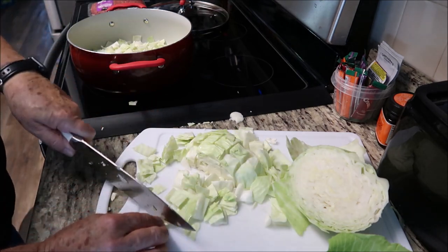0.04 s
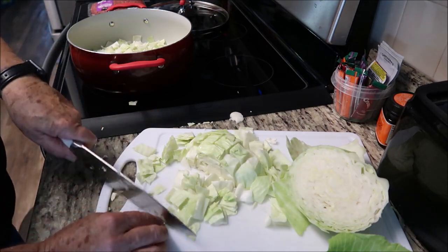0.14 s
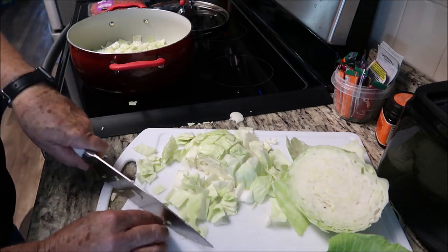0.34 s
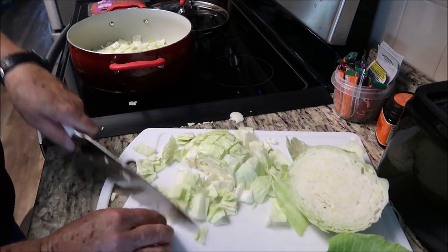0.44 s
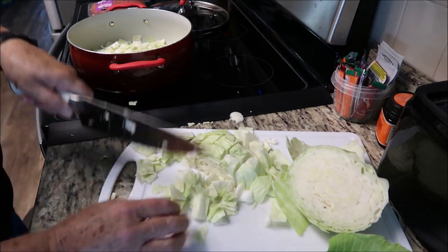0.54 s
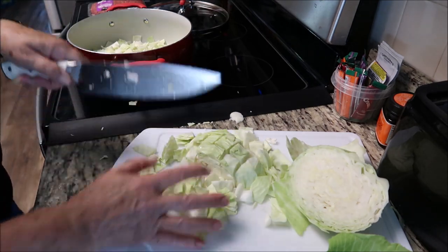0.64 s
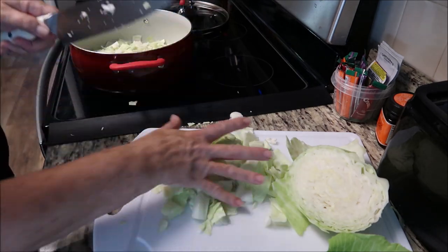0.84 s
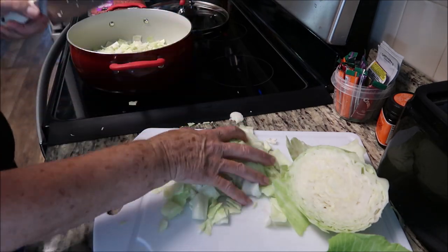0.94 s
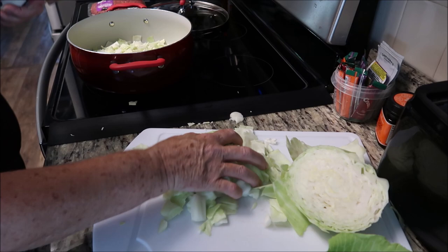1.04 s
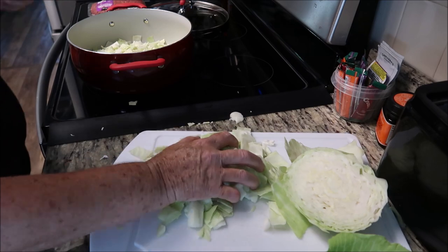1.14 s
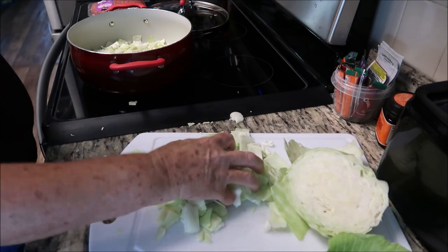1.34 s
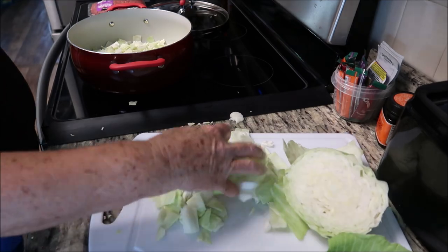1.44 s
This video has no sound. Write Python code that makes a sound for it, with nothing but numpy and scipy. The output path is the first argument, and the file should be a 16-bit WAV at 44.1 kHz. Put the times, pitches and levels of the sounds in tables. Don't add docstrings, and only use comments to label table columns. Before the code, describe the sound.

A knife crunches through cabbage and knocks hard on a plastic board, then pieces rustle

```python
import sys
import numpy as np
from scipy import signal
from scipy.fft import rfft, irfft
from scipy.io import wavfile

SR = 44100
rng = np.random.default_rng(int(sys.argv[2]) if len(sys.argv) > 2 else 0)


def invert_db(x):
    u = np.asarray(x, float) / 20
    return 10 ** u


def digitize_waveform(pressure):
    field = np.atleast_2d(pressure).T
    bounded = np.clip(field, -1, 1)
    quanta = np.round(bounded * 32767).astype(np.int16)
    wavfile.write(sys.argv[1], SR, quanta)


N = 66150
T = np.arange(N) / SR


def in_time(rows):
    s, level, bright = np.transpose(rows)
    return np.interp(T, s, level, left=-120, right=-120), np.interp(T, s, bright)


def rms_one(x):
    return x / np.sqrt(np.mean(x ** 2) + 1e-20)


def drift(rate_hz):
    r = np.exp(-2 * np.pi * rate_hz * 40 / SR)
    noise = rng.standard_normal(N // 40 + 2002)
    slow = signal.lfilter([1], [1, -2 * r, r * r], noise)[2000:]
    return np.interp(np.arange(N) / 40, np.arange(len(slow)), rms_one(slow))


def ring(strikes, hz, t60):
    r = invert_db(-60 / (t60 * SR))
    w = 2 * np.pi * hz / SR
    return signal.lfilter([0, np.sin(w)], [1, -2 * r * np.cos(w), r * r], strikes + 1e-18)


def resonance(x, hz, width):
    r = np.exp(-np.pi * width / SR)
    poles = [1, -2 * r * np.cos(2 * np.pi * hz / SR), r * r]
    return signal.lfilter(np.array([1, 0, -1]) * (1 - r * r) / 2, poles, x)


def colour(x, spectrum):
    hz, db = np.transpose(spectrum)
    bins = np.maximum(np.fft.rfftfreq(N, 1 / SR), 1)
    return irfft(rfft(x) * invert_db(np.interp(np.log(bins), np.log(hz), db)), N)


def bandpass(x, low, high):
    return signal.sosfilt(signal.butter(2, [low, high], "band", fs=SR, output="sos"), x)


def impulses(times, gains):
    out = np.zeros(N)
    np.add.at(out, (np.asarray(times) * SR).astype(int), gains)
    return out


# (frequency [Hz], level [dB])
AIR = [(30, -22.5), (150, -11.5), (500, -7.5), (700, -18), (2500, -27.5), (5000, -44), (10000, -54),
       (14000, -67)]
# (frequency [Hz], width [Hz], level [dB])
DRONE = [(58, 26, -48.5), (238.5, 70, -51.5), (311, 26, -47), (392, 47, -43.5), (486.8, 33, -43.5),
         (546, 35, -50.5)]


def drone(x):
    out = invert_db(-38.5) * rms_one(colour(x, AIR))
    for hz, width, db in DRONE:
        twice = resonance(resonance(x[::-1], hz, width), hz, width)
        out = out + invert_db(db) * rms_one(twice)
    return out


# (frequency [Hz], correlation [0-1])
LIKENESS = [(60, .99), (1000, 0.96), (3000, 0.25), (6000, .35), (12000, .1)]


def kitchen_air():
    mid, side = rng.standard_normal((2, N))
    alike = [(hz, min(c, 0.999)) for hz, c in LIKENESS]
    centre = colour(drone(mid), [(hz, 10 * np.log10((1 + c) / 2)) for hz, c in alike])
    spread = colour(drone(side), [(hz, 10 * np.log10((1 - c) / 2)) for hz, c in alike])
    hum_level = invert_db(-39.5 + 4 * drift(4.2))
    hum = hum_level * np.sin(2 * np.pi * 119.5 * T + 0.5 * drift(6.9))
    return centre + hum + spread * [[1], [-1]]


def grains():
    snaps_per_s, spread_db, smooth_share = 2500, 5, 0.54
    sizes = invert_db(spread_db * np.minimum(rng.exponential(1, N), 5)) * rng.choice([-1, 1], N)
    born = rng.random(N) < snaps_per_s * invert_db(2.0 * drift(70.0)) / SR
    return (1 - smooth_share) * rms_one(sizes * born) + smooth_share * rng.standard_normal(N)


# (time [s], level [dB], brightness [dB])
CUT = [(0, -56, -24.5), (.03, -51, -29), (.09, -54, -24.5), (.14, -47, -20), (.165, -39.5, -15),
       (.19, -36.5, -17), (.198, -32.5, -5), (.212, -27, -2.5), (.2185, -27.5, -8.5)]
# (time [s], level [dB], brightness [dB])
LIFT = [(.36, -73, -15.5), (.42, -50.5, -34), (.45, -50, -11), (.5, -50, -12.5), (.53, -51.5, -11),
        (.57, -49.5, -23), (.7, -65, -4), (.735, -53.5, -12), (0.779, -67, -10)]
# (time [s], level [dB], brightness [dB])
REACH = [(.9, -68.5, -16.5), (.935, -54.5, -4.5), (0.95, -42, -26), (.96, -43, -10.5), (0.976, -51.5, -5),
         (.995, -60, -5), (1.015, -54, -2), (1.03, -46, -10), (1.038, -37.5, -15)]
SWEEP = [(1.05, -50.5, -4), (1.057, -39, -13), (1.074, -31, -26), (1.086, -24.5, -12.5),
         (1.089, -23.5, -5.5), (1.104, -22.5, -11), (1.124, -24.5, -22.5), (1.131, -31, -15),
         (1.16, -44.5, -5)]
GATHER = [(1.236, -43.5, -7), (1.255, -57, -1), (1.303, -59.5, 4), (1.314, -45, -5.5), (1.4, -51.5, -6),
          (1.425, -50, -3.5), (1.456, -49, -8), (1.477, -46.5, 1), (1.5, -42, -17.5)]
# (frequency [Hz], width [Hz], level [dB])
RUB = [(733, 270, -6.5), (1150, 59, 0), (1440, 230, 2), (2178, 300, 1.5), (2920, 400, -6.5),
       (3540, 580, -7.5), (4740, 1200, -18.5), (6040, 400, -24)]
# (frequency [Hz], level [dB])
STALK = [(2400, -26.5), (3300, -3.5), (4600, -3), (5900, -4), (6600, -16.5), (8000, -34.5)]
# (frequency [Hz], level [dB])
LEAF = [(5500, -29), (6600, -6), (7600, -0.5), (10000, -2), (12500, -4), (14500, -12.5), (16000, -30)]


def cabbage():
    source = grains()
    body = np.zeros(N)
    for k, (hz, width, db) in enumerate(RUB):
        body += (-1) ** k * invert_db(db) * resonance(source, hz, width) / np.sqrt(width)
    body = rms_one(body)
    stalk = rms_one(colour(grains(), STALK))
    leaf = rms_one(colour(grains(), LEAF))
    out = invert_db(-49.5) * rms_one(resonance(source, 1710, 90)) * (T < 0.29)
    for rows in (CUT, LIFT, REACH + SWEEP + GATHER):
        level, bright = in_time(rows)
        crisp = invert_db(-2 + 0.66 * bright) * stalk + invert_db(-4 + bright) * leaf
        out = out + invert_db(level) * (body + crisp)
    return out


# (time [s], strength [dB], crack [dB])
KNOCK = [
    (0.2162, -5.5, -34),
    (0.2186, 7, -5),
    (0.22, 5.5, -19.5),
    (.2224, -0.5, -30),
    (0.2241, -9, -18.5),
    (.2315, -13, -28.5),
    (.243, -22.5, -28.5),
]
# (frequency [Hz], level [dB], t60 [s])
BOARD = [(105, -29.5, .2), (158, -28, .08), (320, -30.5, 0.031), (560, -16, 0.018), (890, -12, 0.018),
         (1032, 0, 0.028), (1355, 1, 0.01), (1579, -3.5, 0.024), (1770, -3.5, 0.031), (2247, 2, 0.011),
         (2707, -1.5, 0.01), (3445, -6, 0.014), (4850, -7.5, 0.0099), (6160, -14, .01)]


def knock():
    s, db, crack_db = np.transpose(KNOCK)
    luck_db = rng.normal(0, 2.58, (len(s), len(BOARD)))
    body = np.zeros(N)
    for k, (hz, mode_db, t60) in enumerate(BOARD):
        strikes = impulses(s, invert_db(db + mode_db - 3.5 + luck_db[:, k]))
        body += (-1) ** k * ring(strikes, hz, t60)
    crack_t60_s = 0.01
    fade = signal.lfilter([1], [1, -invert_db(-60 / (crack_t60_s * SR))], impulses(s, invert_db(crack_db)))
    return body + fade * bandpass(rng.standard_normal(N), 2930, 13000)


# (frequency [Hz], level [dB])
BANG = [(600, -10.5), (1200, 0.5), (2100, 9.5), (3000, -7), (5500, -16), (12000, -17)]


def bang():
    return colour(impulses([KNOCK[1][0] + 0.0013], invert_db(32)), BANG)


# (time [s], peak [dB], frequency [Hz], t60 [s])
TICKS = [(0.457, -29.5, 1650, 0.048), (0.467, -33, 1620, 0.053), (.497, -51, 6250, 0.027),
         (.526, -52, 6430, 0.029), (.670, -15, 460, 0.013), (.732, -23.5, 480, 0.028),
         (0.792, -29, 474, 0.04), (.942, -29, 1150, 0.029), (.865, -30, 560, 0.035),
         (1.057, -26.5, 1200, .03), (1.4985, -23.5, 388, 0.035), (1.092, -17.5, 2000, 0.016),
         (1.120, -23.5, 513, 0.044)]


def ticks():
    out = np.zeros(N)
    for s, db, hz, t60 in TICKS:
        out += resonance(ring(impulses([s], invert_db(db)), hz, t60), hz, hz * 0.29)
    return out


# (low edge [Hz], high edge [Hz], level [dB], t60 [s], side level [dB])
ROOM = [(590, 1600, 1, 0.37, -16.5), (1200, 2500, 1, 0.38, -12), (2000, 5000, 3.5, 0.4, -9),
        (4630, 6660, 1, .25, 6), (9050, 15000, 0, .1, -4.5)]


def room(x):
    white = rng.standard_normal((2, SR // 2))
    t = np.arange(SR // 2) / SR
    echo = np.zeros((2, SR // 2))
    for low, high, db, t60, side_db in ROOM:
        echo += bandpass(white, low, high) * invert_db(db - 60 * t / t60) * invert_db(np.array([[0], [side_db]]))
    onset = 1 - np.exp(-t / 0.0019)
    mid, side = signal.fftconvolve(x[None], echo * onset, axes=1)[:, :N]
    return mid + side * [[1], [-1]]


# (frequency [Hz], side level [dB])
PORT_SIDE = [(100, -33.5), (400, -27), (1500, -16), (3000, -9.5), (6000, -4), (12000, -5.5)]


def ports(x):
    lag = np.arange(300) / SR
    burst = rng.standard_normal(300) * np.exp(-lag / 0.0012)
    scattered = signal.lfilter(burst / np.linalg.norm(burst), [1], x)
    quadrature = np.imag(signal.hilbert(x))
    return x + colour(quadrature + invert_db(1.5) * scattered, PORT_SIDE) * [[1], [-1]]


def scene():
    small = cabbage() + ticks()
    reverb = invert_db(-38.5) * room(invert_db(-2.5) * small + bang())
    return ports(small + knock()) + reverb + kitchen_air()


def low_pass(x):
    return signal.sosfilt(signal.butter(12, 20000, fs=SR, output="sos"), x)


# (time [s], gain [dB])
GAIN = [
    (0.224, -0.5),
    (0.302, -8.5),
    (.7, -7),
    (1.02, -3.5),
    (1.12, 0),
    (1.2, 0),
]


def record(dry):
    top, knee = 0.77, 4.9
    x = dry * invert_db(np.interp(T, *np.transpose(GAIN))) / top
    x = top * x / (1 + np.abs(x) ** knee) ** (1 / knee)
    x = signal.sosfilt(signal.cheby2(10, 40, 15800, fs=SR, output="sos"), x)
    x = signal.sosfilt(signal.butter(2, 45.0, "high", fs=SR, output="sos"), x)
    return low_pass(x)


dry = scene()
out = record(dry)
digitize_waveform(out)
```